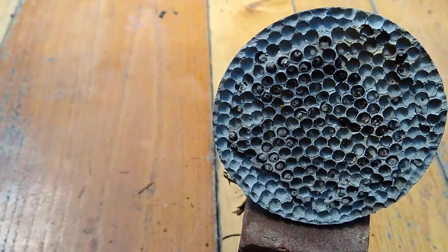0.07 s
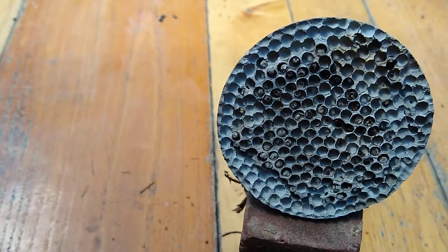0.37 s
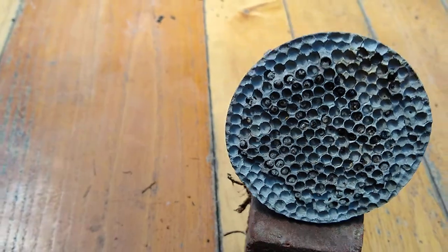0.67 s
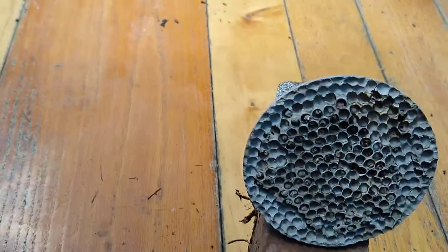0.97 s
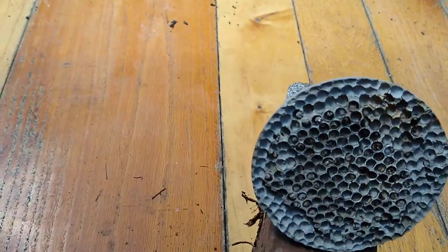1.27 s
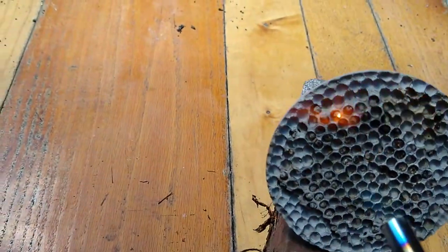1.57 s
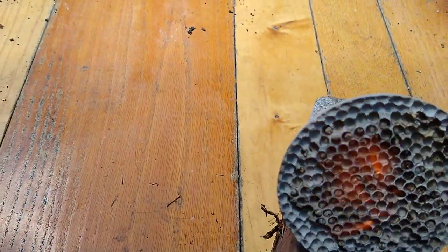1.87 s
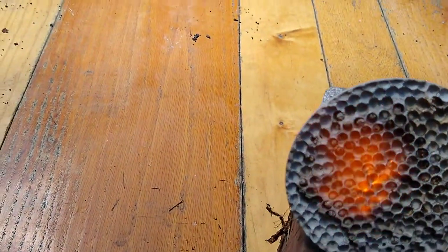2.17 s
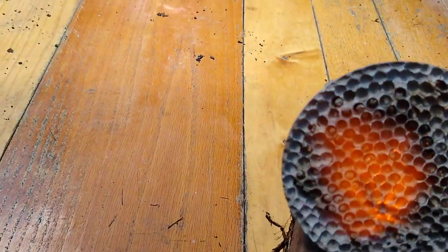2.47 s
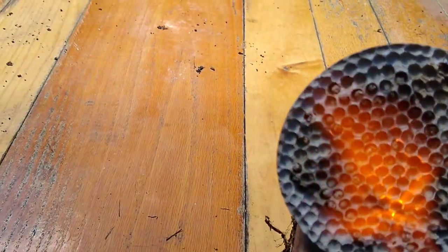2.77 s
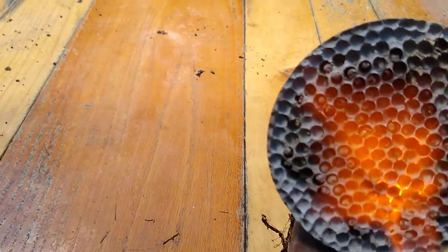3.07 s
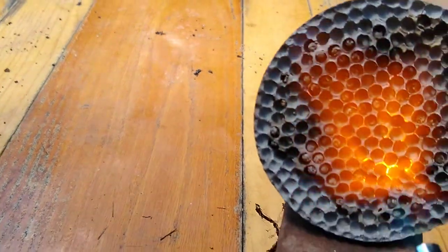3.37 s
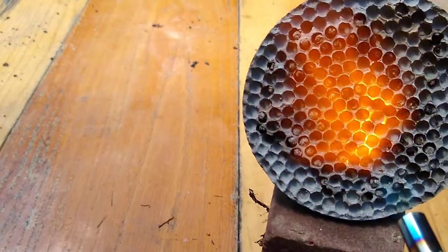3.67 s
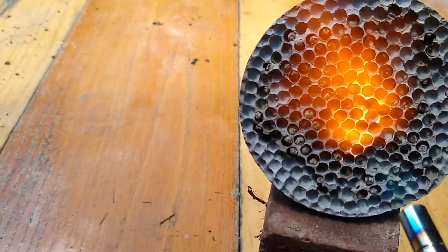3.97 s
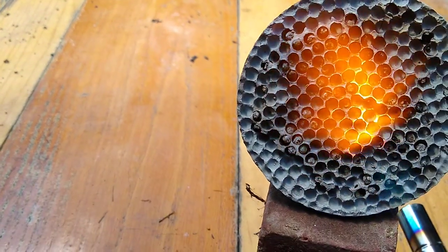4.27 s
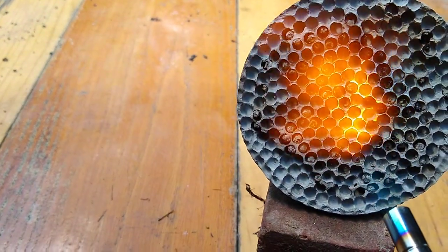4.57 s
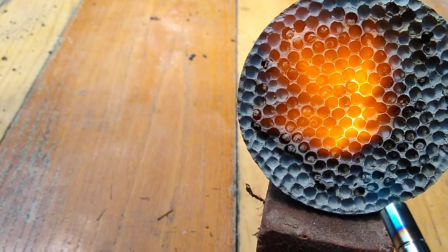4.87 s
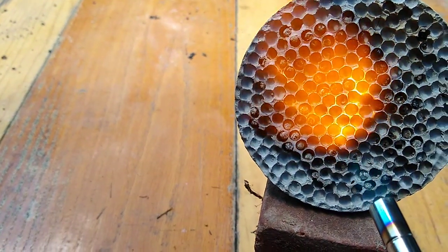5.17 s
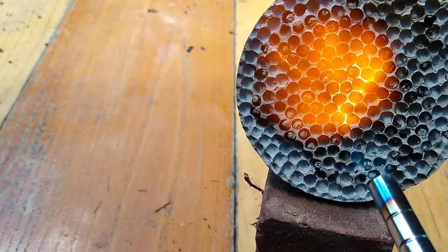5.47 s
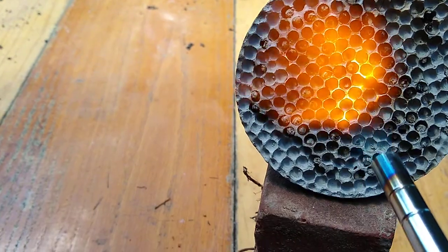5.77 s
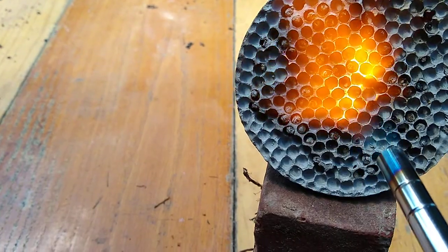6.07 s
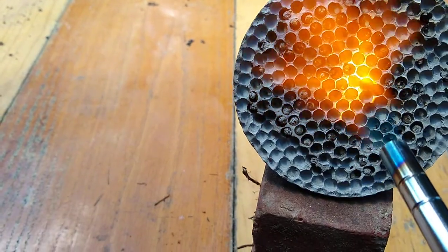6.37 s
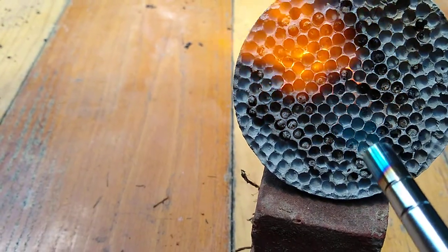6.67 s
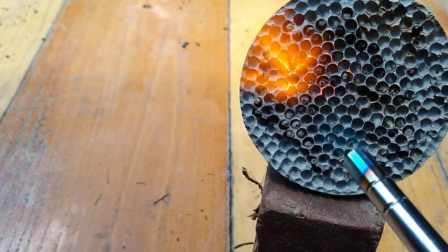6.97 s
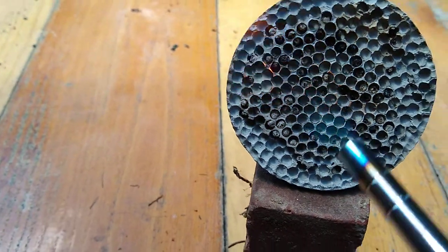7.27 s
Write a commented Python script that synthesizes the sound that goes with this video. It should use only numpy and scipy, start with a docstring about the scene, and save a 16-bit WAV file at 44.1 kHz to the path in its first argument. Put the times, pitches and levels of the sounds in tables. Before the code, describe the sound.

A gas torch clicks alight and roars with a steady hiss against a cement disc, which spits tiny flakes in bright ticks.

```python
"""Gas hisses from a torch, a piezo igniter clicks, and the flame catches with a soft thump.
It swings in from the right and roars against a cement disc on a wooden floor. As the cement heats,
it spits tiny flakes in bright ticks, twice with a low thump; the bigger thump ducks the limiter.
Near the end the flame slips off the edge and the burner tube rings. Two spaced microphones hear it."""
import sys
import numpy as np
from scipy import signal
from scipy.fft import rfft, irfft
from scipy.io import wavfile
from scipy.ndimage import uniform_filter1d, minimum_filter1d

SR = 44100
rng = np.random.default_rng(int(sys.argv[2]) if len(sys.argv) > 2 else 0)


def bounce(signal):
    """Save signal as a 16-bit WAV file at the path given by the first command-line argument."""
    frames = np.transpose(np.atleast_2d(signal))
    limited = np.clip(frames, -1, 1)
    pcm = np.round(limited * 32767).astype(np.int16)
    wavfile.write(sys.argv[1], SR, pcm)


N = 331191
TIME = np.arange(N) / SR
FRAME = 1024
HZ, FRAME_S, _ = signal.stft(np.zeros(N), SR, nperseg=FRAME)
HZ = np.maximum(HZ, 1)[:, None]
VALVE_START_S, SPARK_S, VALVE_OPEN_S = 0.35, 0.49, 0.61
MIC_LAG_S = 0.0004507

# The stereo image slides as the torch is aimed.
# Each row: time in seconds, frequency ratio of the balance pattern, that of the phase pattern.
AIM = [(0, 0.71, 0.73), (.72, 0.63, 0.57), (.95, 0.89, 0.94), (1.3, 0.87, 0.94), (1.6, 0.97, 0.99),
       (3.7, 0.98, 1.015), (6.4, 1.03, 1), (7.51, 1.1, 0.94)]


def from_db(db):
    """Decibels to gain."""
    return 10 ** (np.asarray(db) / 20)


def curve(rows, s):
    """Every column of a time table at the times s."""
    times, *columns = np.transpose(rows)
    return [np.interp(s, times, c) for c in columns]


def at_hz(rows, hz):
    """Every column of a frequency table at hz, on a log axis."""
    points, *columns = np.transpose(rows)
    return [np.interp(np.log(hz), np.log(points), c) for c in columns]


def ramp(low_hz, high_hz):
    """Rises from 0 to 1 between two frequencies."""
    return np.clip(np.log(HZ / low_hz) / np.log(high_hz / low_hz), 0, 1)


def bump(centre_hz, octaves):
    """A bell of height 1 around a frequency."""
    return np.exp(-(np.log2(HZ / centre_hz) / octaves) ** 2)


def band_db(centre_hz, half_width_hz):
    """A resonance with steep skirts, 0 dB on top."""
    return -10 * np.log10(1 + ((HZ - centre_hz) / half_width_hz) ** 4)


def white():
    """Short-time spectra of fresh noise at 0 dB per Hz."""
    return signal.stft(rng.standard_normal(N) * np.sqrt(SR / 2), SR, nperseg=FRAME)[2]


def drift(rate_hz):
    """A smooth random wobble with spread 1, mostly slower than rate_hz."""
    hz = np.arange(N + 1) * SR / (2 * N)
    slow = irfft(rfft(rng.standard_normal(2 * N)) / (1 + (hz / rate_hz) ** 2))[:N]
    return slow / slow.std()


def flutter(depth_db, rate_hz):
    """A gain that wobbles at random around 0 dB."""
    return from_db(depth_db * drift(rate_hz))


def resonate(x, modes):
    """Parallel resonances of alternating polarity. Each mode: pitch in Hz, width in Hz, gain in dB."""
    out = 0
    for k, (hz, width, db) in enumerate(modes):
        r = np.exp(-np.pi * width / SR)
        feed = [(1 - r * r) / 2, 0, (r * r - 1) / 2]
        feedback = [1, -2 * r * np.cos(2 * np.pi * hz / SR), r * r]
        out = out + (-1) ** k * from_db(db) * signal.lfilter(feed, feedback, x + 1e-18)
    return out


def strikes(times, db):
    """One impulse for each event."""
    out = np.zeros(N)
    np.add.at(out, (np.asarray(times) * SR).astype(int), from_db(db))
    return out


def bursts(impulses, decay_s):
    """Each impulse sets off a dying burst of noise."""
    envelope = signal.lfilter([1], [1, -np.exp(-1 / (decay_s * SR))], impulses + 1e-18)
    return envelope * rng.choice([-1, 1], N)


def panned(x, pan_db):
    """Left and right copies; pan is always left minus right in dB."""
    return np.array([x * from_db(pan_db / 2), x * from_db(-pan_db / 2)])


def spaced(pair):
    """A point source reaches the left microphone later and inverted."""
    return np.array([-np.interp(TIME - MIC_LAG_S, TIME, pair[0]), pair[1]])


def stereo_noise(level_db, pan_db, lead, likeness):
    """Coloured noise at both microphones, with their level difference, phase and likeness."""
    likeness = np.clip(likeness, 0, 1)
    shared, ratio = np.sqrt(likeness) * white(), from_db(pan_db)
    gain = from_db(level_db) * np.sqrt(2 / (1 + ratio ** 2))
    left = (shared + np.sqrt(1 - likeness) * white()) * gain * ratio
    right = (shared + np.sqrt(1 - likeness) * white()) * gain * np.exp(-1j * lead)
    return signal.istft(np.array([left, right]), SR, nperseg=FRAME)[1][:, :N]


def aside(end_s=1.45, fade_s=0.84):
    """How far the torch is still held to the right, from 1 to 0."""
    return np.clip((end_s - FRAME_S) / fade_s, 0, 1)


def notch_db():
    """The pan where an echo cancels bands at the right microphone; they slide with the aim."""
    # The cancelled bands. Each row: centre in Hz, width in octaves, pan in dB.
    notches = [(1900, 0.19, 6), (3640, 0.054, 18)]
    slide, _ = curve(AIM, FRAME_S)
    return sum(db * bump(hz * slide, octaves) for hz, octaves, db in notches)


def nozzle_noise(level_db, extra_pan_db=0, aside_db=-0.5):
    """Noise from the nozzle: it reaches the left microphone later and inverted."""
    # The jet's stereo image. Each row: frequency in Hz, pan in dB, likeness from 0 to 1.
    image = [(1800, -0.5, 0.47), (4140, -2.5, 1), (7500, 1.5, 1), (9000, 3.5, 0.2), (10300, 5.5, 0),
             (13300, 1.5, 0.4), (15300, -5, 0.2)]
    pan_db, likeness = at_hz(image, HZ)
    pan_db = pan_db + extra_pan_db + notch_db() + aside_db * aside()
    return stereo_noise(level_db, pan_db, np.pi - 2 * np.pi * HZ * MIC_LAG_S, likeness)


def valve_db(shut_db=-23):
    """The gas flow fades up as the valve opens."""
    return np.interp(FRAME_S, [VALVE_START_S, VALVE_OPEN_S], [shut_db, 0])


def unlit_gas(gas_db=-1, surge_db=12, warm_s=0.74, fade_s=0.14):
    """Cold gas whistles in the burner tube, harder as the valve opens, until the flame takes hold."""
    # The whistle over the quiet room. Each row: frequency in Hz, base level in dB per Hz.
    whistle = [(25, -104), (75, -94), (140, -75), (350, -87.5), (1400, -91.5), (1800, -75), (2300, -90.5),
               (3300, -98.5), (3800, -82), (4300, -99), (5000, -99), (8300, -104), (12000, -99),
               (15500, -92)]
    flow_db = gas_db + np.interp(TIME, [SPARK_S, VALVE_OPEN_S], [0, surge_db])
    cold = np.clip(1 - (TIME - warm_s) / fade_s, 0, 1)
    return nozzle_noise(at_hz(whistle, HZ)[0]) * cold * from_db(flow_db) * flutter(1, rate_hz=8)


def jet(shade_db=-4, shade_end_s=3.3, shade_fade_s=0.39, glare_db=7, glare_s=3.1, glare_width_s=0.7):
    """Gas leaves the nozzle with a mid rasp and a fine sizzle, coloured by where it points."""
    # The colour of the hiss. Each row: frequency in Hz, base level in dB per Hz.
    hiss = [(1500, -100), (3500, -87), (4500, -84.5), (5500, -82.5), (6800, -85.5), (8000, -84),
            (9000, -86.5), (10300, -82), (12000, -83.5), (13300, -81), (14800, -80), (15500, -83)]
    # The hiss rides up and down as the torch moves. Each row: time in seconds, rasp in dB, sizzle in dB.
    moves = [(.6, 8, -6.5), (.87, 8.5, -1), (1.2, 1, -3), (1.6, 8, -1), (3.1, 1.5, -2), (4.6, -0.5, 2),
             (6.4, 1.5, 0), (6.8, -3, 0.5), (7.5, 2, -2)]
    rasp_db, sizzle_db = curve(moves, FRAME_S)
    top = ramp(3300, 10900)
    level_db = at_hz(hiss, HZ)[0] + valve_db() + rasp_db * (1 - top) + sizzle_db * top
    # One band is shaded until the nozzle swings to the front; the very top swells once as it turns.
    shade = np.clip((shade_end_s - FRAME_S) / shade_fade_s, 0, 1)
    glare = np.exp(-((FRAME_S - glare_s) / glare_width_s) ** 2)
    colour_db = shade_db * shade * bump(7900, octaves=0.27) + glare_db * glare * bump(12700, octaves=0.17)
    return nozzle_noise(level_db + colour_db) * flutter(1.06, rate_hz=60)


def igniter(blow_db=12, rattle_db=-2, crack_db=-20):
    """Each click of the piezo hammer is one blow that rattles the torch body for a few milliseconds."""
    # The firing click, then a duller one. Each row: start in seconds, force in dB, treble cutoff in Hz.
    clicks = [(0.5014, -2.5, 17000), (0.6793, -7, 3600)]
    # The ring of the torch body. Each row: pitch in Hz, width in Hz, gain in dB.
    body_modes = [(1910, 1650, 8), (3200, 3700, 2), (4900, 1200, -12), (7300, 660, -1.5), (13100, 1900, -6)]
    out = 0
    for s, db, cutoff_hz in clicks:
        blow = strikes([s], db)
        rattle = bursts(blow, decay_s=0.002)
        body = resonate(from_db(blow_db) * blow + from_db(rattle_db) * rattle, body_modes)
        lowpass = signal.butter(2, cutoff_hz, fs=SR, output="sos")
        out = out + signal.sosfilt(lowpass, body + from_db(crack_db) * rattle)
    return spaced(panned(out, pan_db=2))


def flame(roar_db=-.5, catch_db=21.5, swell_s=0.083, bright_db=1.5, dull_db=5.5, settle_s=0.75):
    """Turbulent burning: the roar swells fast, brightens as it settles on the disc, and eddies shake it."""
    # The colour of the roar. Each row: frequency in Hz, base level in dB per Hz.
    roar = [(25, -105), (55, -107), (100, -64), (190, -51), (310, -59), (460, -52.5), (850, -50.5),
            (1250, -56), (1650, -57), (2150, -62), (2650, -59.5), (3300, -66), (4000, -77.5), (6000, -100)]
    # How squarely the flame lies on the disc. Each row: time in seconds, contact from 0 to 1.
    contacts = [(1.3, 0), (1.75, 0.35), (1.92, 0.47), (3.3, 0.94), (4.4, 0.98), (6.3, 0.91), (6.8, 0.53),
                (7.3, 0.15)]
    # The brightness that full contact brings. Each row: frequency in Hz, lift in dB.
    contact_lift = [(450, 0.5), (900, 2), (1800, 1.5), (2500, 11), (3500, 12)]
    # A hollow tone climbs as the torch nears the disc. Each row: time in seconds, boost in dB, pitch in Hz.
    hollow = [(.55, 8, 500), (.85, 3.5, 550), (1.1, 3, 960), (1.6, 6.5, 1400), (2.2, 4.5, 1600)]
    # The burner tube's narrow peaks in the roar. Each row: pitch in Hz, width in octaves, boost in dB.
    pipe_modes = [(2600, 0.077, 2), (3460, 0.055, 3)]
    # The flame's stereo image. Each row: frequency in Hz, pan in dB, lead of the left side in radians.
    image = [(40, 4, -2.2), (100, 6.5, -1.1), (190, 3, -.95), (300, -.4, -.8), (480, -.5, -.38),
             (800, -.2, -.06), (1250, .6, .12), (1600, 5.6, .6), (1900, 11.5, 1.6), (2200, 2.6, 3.3),
             (2550, -2.2, 4.5), (3200, 0, 5.4), (3580, 9, 6.1), (3900, 0, 9.4)]
    age = np.maximum(FRAME_S - SPARK_S, 0)
    contact, = curve(contacts, FRAME_S)
    hollow_db, hollow_hz = curve(hollow, FRAME_S)
    swell_share = 0.6 + 0.4 * ramp(200, 420)   # the low rumble is there first
    level_db = at_hz(roar, HZ)[0] + (roar_db - catch_db * np.exp(-age / swell_s)) * swell_share
    level_db += (bright_db - dull_db * np.exp(-age / settle_s)) * ramp(530, 950)
    level_db += (contact - 1) * at_hz(contact_lift, HZ)[0]
    level_db += hollow_db * (bump(hollow_hz, octaves=1) - .5)
    level_db += contact * sum(db * bump(hz, octaves) for hz, octaves, db in pipe_modes)

    pan_slide, phase_slide = curve(AIM, FRAME_S)
    aside_db = -12 * aside() * (1 - ramp(450, 1700))   # lit beside the right microphone
    pan_db = at_hz(image, HZ / pan_slide)[0] + aside_db
    lead = at_hz(image, HZ / phase_slide)[1]
    sound = stereo_noise(level_db, pan_db, lead, likeness=.99 - .05 * ramp(1200, 1900))
    sound = sound * (TIME > SPARK_S) * flutter(1.04, rate_hz=110) * flutter(0.6, rate_hz=4)
    low_cut = signal.butter(3, 70, "high", fs=SR, output="sos")   # a small flame has no deep bass
    return signal.sosfilt(low_cut, sound)


def thumps(rest_hz=58, slowing_s=.0028, attack_s=.001, lag_s=.0006):
    """A puff of pressure swings ever slower and pushes the two microphones in opposite directions."""
    # The gas catches, then the cement pops twice.
    # Each row: start in seconds, strength in dB, starting pitch in Hz, decay in seconds, pan in dB.
    puffs = [(.502, -5.5, 220, .0065, -3), (3.255, -18, 220, .008, 0), (5.3415, 5.5, 450, .0075, 2)]
    out = 0
    for s, db, start_hz, decay_s, pan_db in puffs:
        age = np.maximum(TIME - s, 0)
        turns = rest_hz * age + (start_hz - rest_hz) * slowing_s * (1 - np.exp(-age / slowing_s))
        envelope = from_db(db) * (1 - np.exp(-age / attack_s)) * np.exp(-age / decay_s)
        out = out + panned(envelope * np.sin(2 * np.pi * turns), pan_db)
    return np.array([out[0], -np.interp(TIME - lag_s, TIME, out[1])])


def burner(half_width_hz=360, pan_db=-1.5):
    """The flame rasps in the burner's mouth; the two microphones hear it in opposite phase."""
    # The rasp rises as the tube warms. Each row: time in seconds, level in dB per Hz, centre in Hz.
    rasp = [(.55, -73, 1750), (.72, -59, 1780), (.98, -58, 1960), (1.3, -60.5, 2020), (1.7, -62, 2250),
            (2.05, -58, 2420), (3.1, -59, 2520), (3.8, -65, 2620)]
    peak_db, centre_hz = curve(rasp, FRAME_S)
    level_db = peak_db + band_db(centre_hz, half_width_hz)
    sound = stereo_noise(level_db, pan_db + notch_db(), lead=np.pi, likeness=1)
    return sound * (TIME > SPARK_S) * flutter(2.5, rate_hz=70)


def rush():
    """A breathy band of jet noise, strongest while the flame is clear of the disc."""
    # The band's sweep. Each row: time in seconds, level in dB per Hz, centre in Hz, half-width in Hz.
    sweep = [(.62, -63.5, 2680, 200), (.77, -63.5, 2610, 230), (.88, -61.5, 3080, 425),
             (1.0, -65.5, 3520, 374), (1.3, -67, 3560, 382), (1.6, -88, 3900, 300), (2.1, -82, 4150, 324),
             (3.3, -75, 4540, 345), (3.9, -101, 4420, 350), (7.05, -78, 3700, 347),
             (7.27, -70.5, 3520, 400), (7.45, -59.5, 3200, 460)]
    peak_db, centre_hz, half_width_hz = curve(sweep, FRAME_S)
    level_db = peak_db + valve_db() + band_db(centre_hz, half_width_hz)
    return nozzle_noise(level_db) * (TIME > SPARK_S) * flutter(2, rate_hz=50)


def tube(pan_db=4):
    """The burner tube rings as the flame glances off the disc's edge, and is damped when it lies square."""
    # The tube's upper resonances. Each row: pitch in Hz, width in octaves, gain in dB.
    modes = [(3150, 0.056, 3.5), (3830, .06, 0), (4840, .07, -2.5), (5960, 0.049, -9)]
    # How hard they ring. Each row: time in seconds, base level in dB per Hz, pitch ratio.
    ringing = [(1.2, -74, 0.88), (1.55, -70.5, 1.04), (2.1, -74, 0.79), (6.3, -88, 0.93),
               (6.72, -68.5, 1.03), (7.15, -72.5, 1.04), (7.5, -69, 0.94)]
    ring_db, ratio = curve(ringing, FRAME_S)
    peaks = sum(from_db(db) * bump(hz * ratio, octaves) for hz, octaves, db in modes)
    level_db = ring_db + 20 * np.log10(peaks + 1e-6)
    return nozzle_noise(level_db, pan_db) * (TIME > SPARK_S) * flutter(0.5, rate_hz=20)


def spalling(faint_per_s=16, faint_db=-31, spread_db=2.5, pan_db=2, scatter_db=3, decay_s=.0004):
    """Flakes burst off the cement with tiny, bright ticks; faint ones thicken as it heats up."""
    # The sharpest snaps. Each row: start in seconds, force in dB, body relative to that force in dB.
    ticks = [(2.7690, -17, -2), (3.2549, -13, -7), (3.2680, -17, -7), (3.6038, -18.5, -1),
             (4.2761, -17, -8), (5.0075, -22, -10), (5.0228, -24, -10), (5.0802, -21, -5),
             (5.0839, -16, -5), (5.1060, -19, -11), (5.1548, -19, -9), (5.2156, -23, -4), (5.3416, -15, -8),
             (5.4852, -17.5, -7), (5.7270, -20, -9), (5.7582, -20, -13), (5.7994, -21, -8),
             (6.1754, -19, -11), (6.2727, -22, -14), (6.3590, -22, -10), (6.3811, -18, -8),
             (6.4241, -22, -2), (6.7073, -19, -4), (6.7840, -23, 0), (6.8450, -19, 0), (6.9874, -24, -9),
             (7.2511, -23, -13), (7.3797, -19, -5)]
    # How hot the face of the disc is. Each row: time in seconds, heat from 0 to 1.
    heating = [(2.5, 0), (4.8, .15), (5.1, 0.8), (6.9, 0.9), (7.5, .4)]
    snap_mode, body_mode = (13900, 7000, 3.4), (5400, 3400, 2)
    times, force_db, body_db = np.transpose(ticks)
    heat, = curve(heating, TIME)
    flaking = rng.random(N) < faint_per_s * heat / SR
    faint = flaking * from_db(faint_db + spread_db * np.clip(rng.standard_normal(N), -2, 2))
    place_db = pan_db + scatter_db * rng.standard_normal(N)
    snaps = strikes(times, force_db) + faint
    bodies = strikes(times, force_db + body_db)
    out = 0
    for impulses, mode in (snaps, snap_mode), (bodies, body_mode):
        crackle = bursts(panned(impulses, place_db), decay_s)
        out = out + resonate(resonate(crackle, [mode]), [mode])   # twice, for steeper skirts
    return spaced(out)


def scene():
    """The torch and the spitting cement, in stereo."""
    return unlit_gas() + jet() + igniter() + flame() + thumps() + burner() + rush() + tube() + spalling()


def record(dry, ceiling_db=-1.5, release_db_per_s=19, cutoff_hz=15600):
    """A limiter ducks on the biggest peak and recovers slowly; the top is cut."""
    over_db = np.maximum(20 * np.log10(np.abs(dry).max(axis=0) + 1e-9) - ceiling_db, 0)
    duck_db = np.maximum.accumulate(over_db + release_db_per_s * TIME) - release_db_per_s * TIME
    gain = uniform_filter1d(minimum_filter1d(from_db(-duck_db), size=41), size=41)
    high_cut = signal.ellip(12, .1, 80, cutoff_hz, fs=SR, output="sos")
    return signal.sosfilt(high_cut, dry * gain)


dry = scene()
out = record(dry)
bounce(out)
```